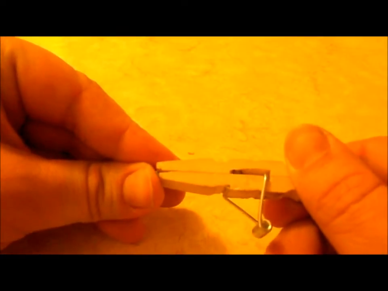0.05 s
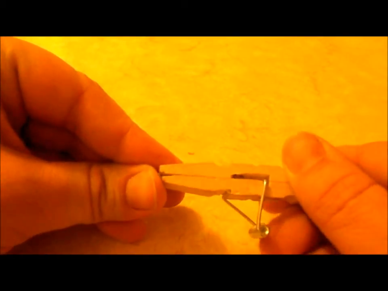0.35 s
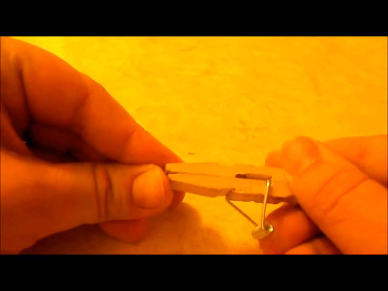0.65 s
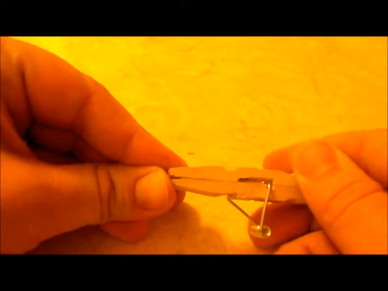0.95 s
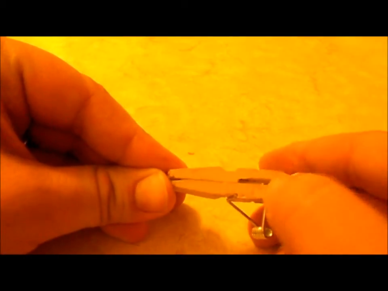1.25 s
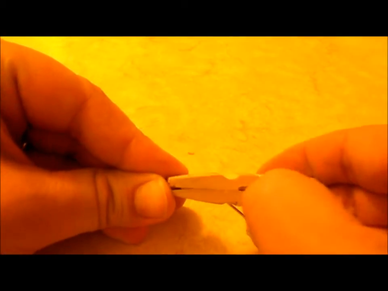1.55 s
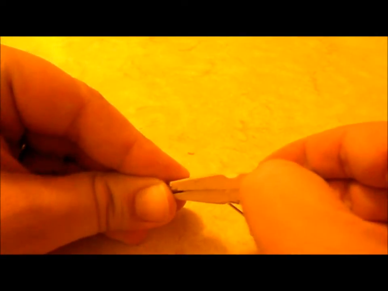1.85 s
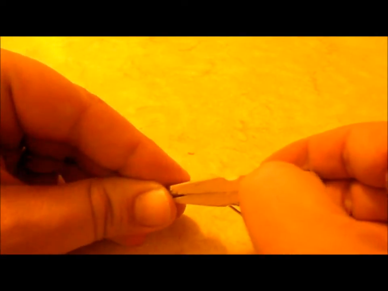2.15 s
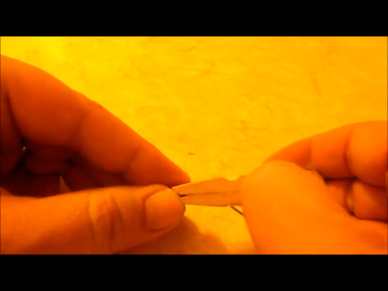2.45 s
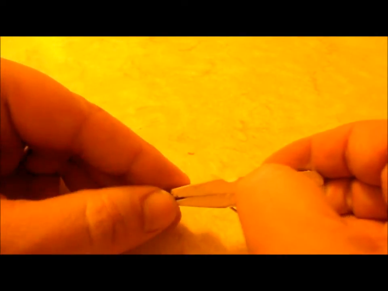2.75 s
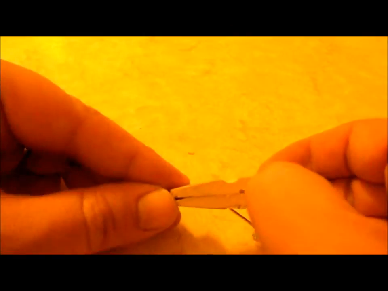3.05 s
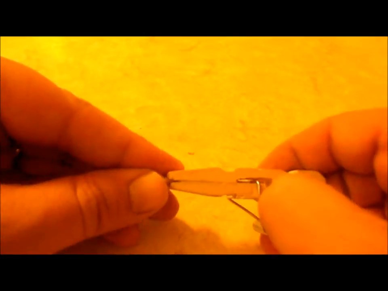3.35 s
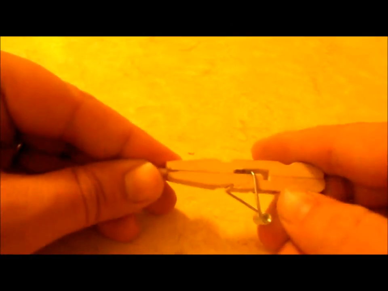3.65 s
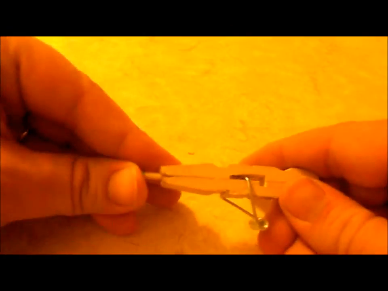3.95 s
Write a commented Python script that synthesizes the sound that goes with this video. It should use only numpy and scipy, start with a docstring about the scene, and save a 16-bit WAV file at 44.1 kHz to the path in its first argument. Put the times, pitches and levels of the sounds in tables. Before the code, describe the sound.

A wooden clothespin snaps shut close to the microphone. For the first three seconds, fingers softly bump and rub the wood, with small dry clicks from the wire spring. At about 3.2 seconds the spring slips and the jaws clap together in one loud, bright crack. A soft touch or two follows near 3.9 seconds. Quiet room hiss, low hum and a very faint tick each second lie underneath.

```python
"""A quiet room, a small microphone, two hands working a wooden clothespin close in front of it.
From the start: room rumble, hiss, a low electronic hum, a thin whine and a faint tick once a second,
like a distant clock. For three seconds fingers bump and rub the wood and the wire clicks against it.
At 3.2 s the steel spring slips with a bright crack; 20 ms later the wooden jaws clap shut.
The background dips briefly, and a few last soft touches follow."""
import sys
import numpy as np
from scipy import signal
from scipy.fft import rfft, irfft, next_fast_len
from scipy.io import wavfile
from scipy.ndimage import uniform_filter1d, map_coordinates

SR = 44100
rng = np.random.default_rng(int(sys.argv[2]) if len(sys.argv) > 2 else 0)


def unload_audio(sound):
    """Save the sound as a 16-bit wav file, at the path given as the first command line argument."""
    columns = np.transpose(np.atleast_2d(sound))
    # keep every value between -1 and 1, then stretch to whole-number steps
    steps = np.round(np.clip(columns, -1, 1) * 32767)
    wavfile.write(sys.argv[1], SR, steps.astype(np.int16))


N = 176400


def amp(db):
    """Decibels to gain."""
    return 10 ** (np.asarray(db) / 20)


def unit(x):
    """Scale to rms 1."""
    return x / np.sqrt(np.mean(x ** 2) + 1e-20)


def along(points, hz):
    """Read (f/Hz, value) points on a log frequency axis."""
    f, v = np.transpose(points)
    return np.interp(np.log(hz + 1), np.log(f + 1), v)


def filtered(x, response):
    """Apply a frequency response."""
    size = next_fast_len(N + SR // 2)
    return irfft(rfft(x, size) * response(np.fft.rfftfreq(size, 1 / SR)), size)[:N]


def noise(spectrum):
    """Coloured noise of rms 1."""
    return unit(filtered(rng.standard_normal(N), lambda hz: amp(along(spectrum, hz))))


def since(s):
    """Seconds since time s, zero before it."""
    return np.maximum(np.arange(N) / SR - s, 0)


def fade(t, t60, rise):
    """A quick rise and an exponential decay; all times in seconds."""
    return np.exp(-np.log(1000) * t / t60) * (1 - np.exp(-t / rise))


def strokes(rows):
    """Envelope of sliding movements: each rises fast, holds and trails off."""
    progress, gain = [0, .2, .6, 1.2], [0.0088, 0.9, 0.57, 0.011]
    return sum(amp(db) * np.interp(since(s) / length, progress, gain) for s, length, db in rows)


def ring(modes, s, rise):
    """Damped modes struck at time s."""
    start = int(s * SR)
    t = since(s)[start:start + SR // 2]
    ringing = sum(amp(db) * fade(t, t60, rise) * np.sin(2 * np.pi * hz * t) for hz, db, t60 in modes)
    return np.pad(ringing, (start, N))[:N]


def blows(rows, modes, spectrum, grit_db, grit_t60, rise):
    """Each contact rings the modes and sheds a short burst of splintery noise."""
    grit = amp(grit_db) * noise(spectrum)
    return sum(amp(db) * (ring(modes, s, rise) + grit * fade(since(s), grit_t60, rise))
               for s, db in rows)


# modes of the far-off tick: f/Hz, level/dB
TICK_MODES = [(1152, -2), (2135, 0.5), (3655, -8), (4960, -7), (5776, -10)]


def ticks(first_s=.41, period_s=1, level_db=-57.5, rise=0.025, t60=0.17):
    """A faint, blurred metallic tick, like a clock some way from the microphone."""
    ticking = 0
    for k in range(4):
        t = since(first_s + k * period_s)
        tone = sum(amp(db) * np.sin(2 * np.pi * (hz * t + rng.random())) for hz, db in TICK_MODES)
        ticking += fade(t, t60, rise) * tone
    return amp(level_db) * ticking / fade(since(0), t60, rise).max()


# rumble and hiss of the quiet room: f/Hz, level/dB
ROOM_TONE = [(12, -29), (20, 2.5), (169, -2), (271, -3), (343, -1), (523, -5), (681, -4), (1180, -11),
             (1500, -11.5), (1670, -13), (4780, -17.5), (6050, -18), (7870, -19.5), (9980, -20.5),
             (10800, -29), (14000, -54), (22000, -120)]
# gain of the whole background, swelling early on and dipping after the snap: t/s, level/dB
SWELL = [(0, 2.5), (.47, 3.5), (.58, 5), (.7, 8), (1.1, 3.5), (1.7, 0), (2.4, -0.5), (3.2, -1),
         (3.25, -1.5), (3.345, -5.5), (3.4, 0), (4, 0)]


def background(repeat_hz=59.827, whine_hz=7867.3):
    """Room tone, ticks, a low electronic hum near 60 Hz and a thin whine rise and fall together."""
    t = since(0)
    room_tone = amp(-51) * noise(ROOM_TONE)
    hum = amp(-63) * np.sin(2 * np.pi * repeat_hz * t)
    whine_t = t % (1 / repeat_hz)  # restarts about 60 times a second
    whine = amp(-60.5) * np.sin(2 * np.pi * whine_hz * whine_t)
    swell = amp(np.interp(t, *np.transpose(SWELL)))
    return swell * (room_tone + np.sqrt(2) * (hum + whine) + ticks())


# decay of the room, almost dead near 1 kHz: f/Hz, t60/s
ROOM_DECAY = [(150, 0.35), (1000, -0.01), (2500, 0.28), (8000, 0.23)]
# colour of its reflections: f/Hz, level/dB
REFLECTIONS = [(100, 11), (220, -3), (400, 5), (950, -1), (1600, -1), (2450, -4.5), (3000, -8), (3400, -4),
               (4400, -10), (5700, -10.5), (7000, 0), (9000, 0), (9900, -9)]


def room(x, wet_db=-16.5, build_s=0.0013):
    """The short tail of a furnished room, well below the direct sound at this close range."""
    hz, t, bands = signal.stft(rng.standard_normal(SR // 2), SR, nperseg=256)
    colour = amp(along(REFLECTIONS, hz))[:, None]
    decay = fade(t, along(ROOM_DECAY, hz)[:, None], build_s)
    tail = signal.istft(bands * colour * decay, SR, nperseg=256)[1]
    return amp(wet_db) * signal.fftconvolve(x, tail / np.linalg.norm(tail))[:N]


# changes of grip: t/s, length/s, level/dB
GRIP_SHIFTS = [(.56, 0.11, -45), (.79, 0.066, -38), (1.38, 0.13, -57)]
# their rumble: f/Hz, level/dB
GRIP_SPECTRUM = [(20, -16), (50, 1.5), (120, -25), (250, -14.5), (600, -35), (2000, -72)]


def grip():
    """The hands shift their grip with a low rumble, right by the microphone."""
    return strokes(GRIP_SHIFTS) * noise(GRIP_SPECTRUM)


# skin slides over the wood: t/s, length/s, level/dB
SKIN_RUBS = [(.572, 0.037, -40.5), (.595, .14, -44.5), (.978, .04, -41), (2.725, 0.033, -52.5),
             (3.61, 0.078, -53.5), (3.698, 0.052, -47)]
# its hiss: f/Hz, level/dB
SKIN_SPECTRUM = [(500, 0), (2000, -7), (5000, -6), (8000, -2.5), (10000, 2), (11000, -12.5)]
# the two wooden halves scuff under the squeeze: t/s, length/s, level/dB
WOOD_SCUFFS = [(2.10, 0.089, -53), (2.21, 0.15, -54), (2.41, 0.063, -50), (2.82, .04, -56)]
# their scrape: f/Hz, level/dB
WOOD_SPECTRUM = [(500, -4), (900, -12), (1300, 2.5), (2000, -16), (3000, -22), (4400, -5), (6000, -18),
                 (10000, -26)]


def friction(grain_db=4.5, grains_per_s=300):
    """Grainy friction of skin on wood and wood on wood."""
    roughness = map_coordinates(rng.standard_normal(N // 10), [since(0) * grains_per_s])
    grain = amp(grain_db * roughness)
    skin = strokes(SKIN_RUBS) * unit(noise(SKIN_SPECTRUM) * grain)
    wood = strokes(WOOD_SCUFFS) * unit(noise(WOOD_SPECTRUM) * grain)
    return skin + wood


# fingers bump the peg: t/s, level/dB, rise/s
FINGER_BUMPS = [(0.201, -33.5, .008), (0.35, -32.5, 0.0006), (0.465, -31, 0.0017), (0.502, -32.5, .003),
                (.511, -32.5, 0.0025), (0.569, -37, .001), (0.605, -39, .002), (0.734, -42, .001),
                (0.802, -34, 0.0072), (0.978, -38, 0.0023), (1.16, -43, 0.0033), (1.386, -44.5, 0.0011),
                (1.665, -29.5, 0.014), (1.725, -40, 0.0043), (1.987, -37.5, 0.0037), (2.112, -35, 0.0093),
                (2.232, -34.5, 0.0027), (2.301, -37, 0.0024), (2.475, -38, .008), (2.603, -32.5, .004),
                (2.621, -36, 0.0032), (2.743, -38, 0.0036), (2.932, -38, 0.0029), (3.007, -37.5, 0.0067),
                (3.128, -32.5, 0.011), (3.861, -35.5, .006)]
# resonances of the held peg: f/Hz, width/Hz, level/dB
HELD_MODES = [(288, 51, 0), (496, 67, -6), (615, 100, -7), (1190, 260, -32.5)]


def finger_bumps(t60=.085):
    """Soft finger contacts stir the low resonances of the held peg."""
    def body(f):
        """Band-pass resonances summed with alternating signs."""
        return sum((-1) ** k * amp(db) * 1j * f * width / (hz * hz - f * f + 1j * f * width)
                   for k, (hz, width, db) in enumerate(HELD_MODES))

    power = sum((amp(db) * fade(since(s), t60, rise)) ** 2 for s, db, rise in FINGER_BUMPS)
    stir = filtered(rng.standard_normal(N), body)
    running_rms = np.sqrt(np.abs(uniform_filter1d(stir ** 2, size=700)) + 1e-20)
    return stir / running_rms * np.sqrt(power)


# small dry clicks of the wire: t/s, level/dB, t60/s, rasp over tap/dB
WIRE_CLICKS = [(0.352, -31.5, 0.011, -12), (0.463, -30, 0.01, -20), (0.502, -35.5, .009, -14),
               (0.508, -33, 0.01, -12), (0.566, -27, .008, -12), (0.5705, -27, 0.019, 5.5),
               (0.737, -36, 0.0082, -15), (0.999, -39, .005, -2), (1.385, -39, 0.012, -3),
               (2.26, -44, .01, 9), (2.301, -40, 0.015, -6), (2.933, -45, .01, -18),
               (3.005, -33.5, 0.0078, -13), (3.958, -47, 0.009, 6)]
# the woody tap: f/Hz, level/dB
TAP_SPECTRUM = [(300, 4.5), (800, 3), (1300, 5), (2300, -7.5), (3300, -5.5), (5200, -3.5), (6500, -11.5),
                (8000, -11), (10500, -18)]
# the bright rasp: f/Hz, level/dB
RASP_SPECTRUM = [(300, -18), (2000, -8.5), (5000, -9.5), (8000, 1.5), (10500, 1.5)]


def wire_clicks(rise=0.00031):
    """The wire catches on the wood: a woody tap with more or less rasp."""
    tap, rasp = noise(TAP_SPECTRUM), noise(RASP_SPECTRUM)
    return sum(amp(db) * fade(since(s), t60, rise) * (tap + amp(rasp_db) * rasp)
               for s, db, t60, rasp_db in WIRE_CLICKS)


# the spring slips and chatters: t/s, level/dB
SPRING_SLIPS = [(3.1940, 1), (3.1948, -10), (3.2028, -19), (3.2078, -25), (3.2103, -33)]
# modes of the spring on the wood: f/Hz, level/dB, t60/s
SPRING_MODES = [(240, -48, 0.022), (650, -34, 0.02), (775, -18.5, 0.014), (1660, -21.5, 0.01),
                (2920, -14.5, 0.0078), (3340, -27, .008), (5550, -8, 0.008), (6620, -5, .006),
                (7660, -10, .007), (8470, -8.5, 0.0064), (9750, -2, 0.0064), (10280, -20, .008)]
# noise of each slip: f/Hz, level/dB
CRACK_SPECTRUM = [(100, -24), (1000, -23), (4000, 6), (5800, -5), (7000, 20), (9000, 11), (10500, 2)]


def spring_crack():
    """The steel spring slips free with a bright crack, close to the microphone."""
    return blows(SPRING_SLIPS, SPRING_MODES, CRACK_SPECTRUM, grit_db=-12.5, grit_t60=0.013, rise=.00005)


# the jaws meet and settle: t/s, level/dB
JAW_CLAPS = [(3.2126, -14.5), (3.2135, 1), (3.2179, -22)]
# modes of the jaws: f/Hz, level/dB, t60/s
JAW_MODES = [(240, -36, 0.03), (598, -17, 0.049), (778, -19, 0.033), (1230, -21.5, 0.016),
             (1607, -16.5, 0.022), (1790, -18.5, 0.015), (2280, -14.5, 0.011), (2454, -10, 0.01),
             (2928, -15.5, 0.021), (3030, -20.5, .016), (3300, -16, 0.013), (4290, -12.5, 0.0072),
             (5670, -9.5, 0.008), (6820, -15, 0.0055), (7160, -6.5, 0.0053), (7660, -16.5, 0.0066),
             (10100, -21, 0.016)]
# noise of each clap: f/Hz, level/dB
CLAP_SPECTRUM = [(100, -37), (700, 2), (1000, -11), (2500, 1), (4500, 0.5), (7500, -1), (10500, -1.5)]
# low shudder of the hands: f/Hz, level/dB, t60/s
HAND_MODES = [(54.7, -42, 0.39), (133, -37, .17), (194, -41.5, 0.13), (246, -16.5, 0.041),
              (322, -31, 0.059)]


def jaw_clap():
    """The wooden jaws clap shut, and the hands shudder at their last contact."""
    clap = blows(JAW_CLAPS, JAW_MODES, CLAP_SPECTRUM, grit_db=-14.5, grit_t60=0.023, rise=.00015)
    shudder = ring(HAND_MODES, JAW_CLAPS[-1][0], rise=0.0023)
    return clap + shudder


def scene():
    """In mono: the peg close up, the room around it, the background behind."""
    peg = spring_crack() + jaw_clap() + finger_bumps() + wire_clicks() + friction() + grip()
    return (peg + room(peg) + background())[None]


def record(dry, mic_top_hz=10600, output_top_hz=16000):
    """The small microphone passes little above its band; peaks clip at full scale, then are low-passed."""
    def low_pass(x, top_hz):
        return filtered(x, lambda hz: 1 / np.sqrt(1 + (hz / top_hz) ** 120))

    clipped = np.clip(low_pass(dry[0], mic_top_hz), -1, 1)
    return low_pass(clipped, output_top_hz)[None]


dry = scene()
out = record(dry)
unload_audio(out)
```